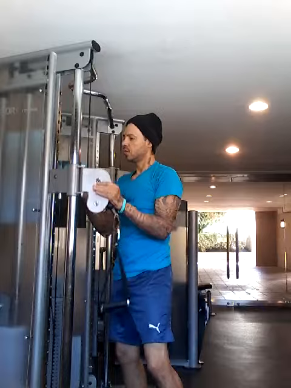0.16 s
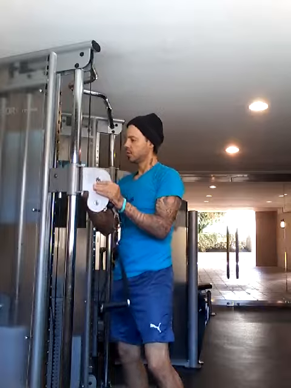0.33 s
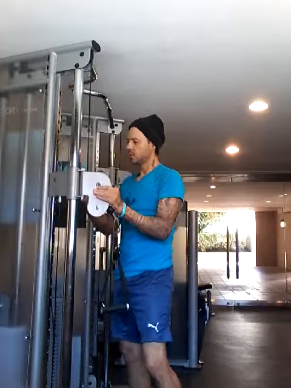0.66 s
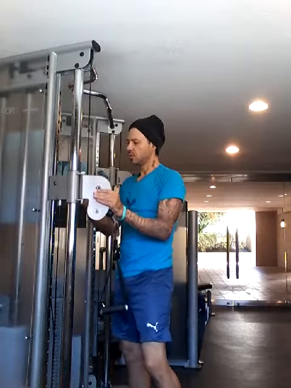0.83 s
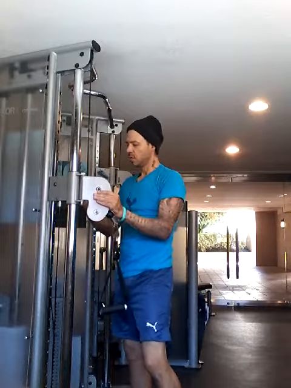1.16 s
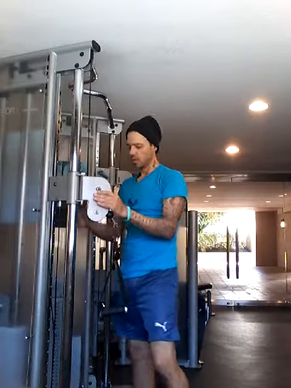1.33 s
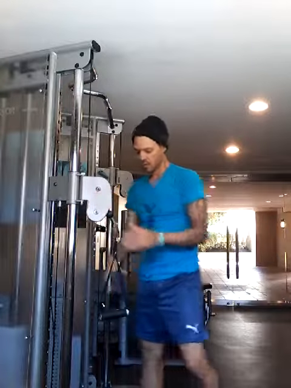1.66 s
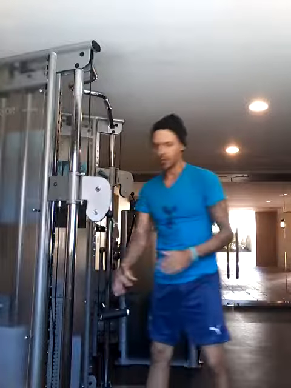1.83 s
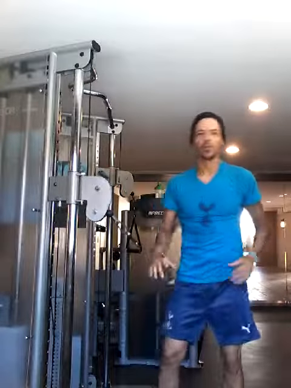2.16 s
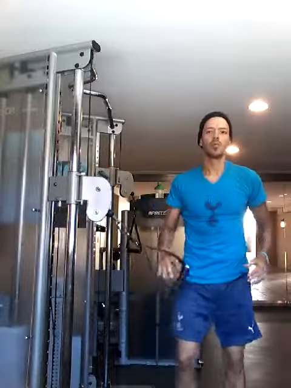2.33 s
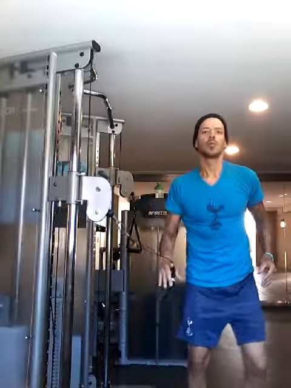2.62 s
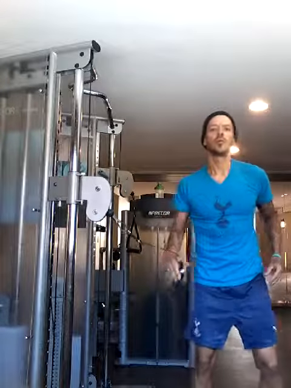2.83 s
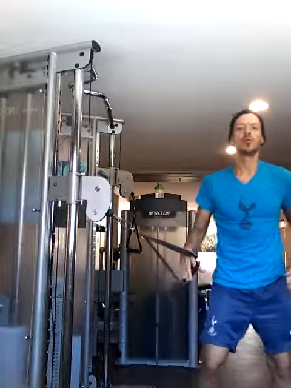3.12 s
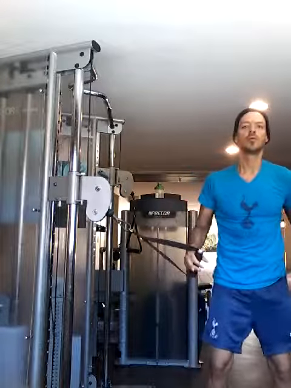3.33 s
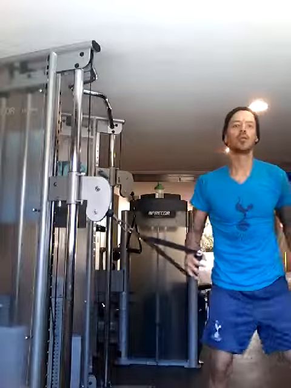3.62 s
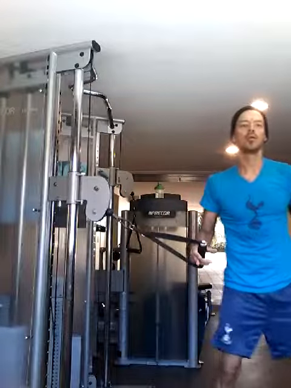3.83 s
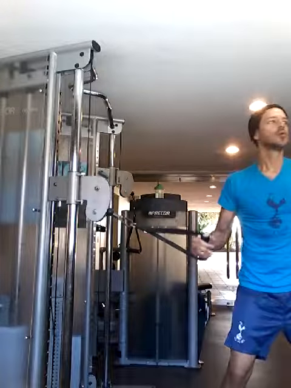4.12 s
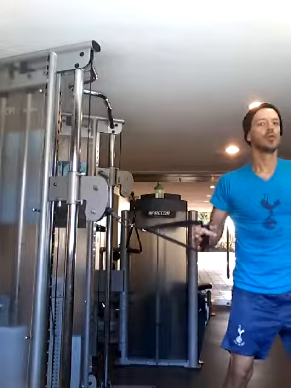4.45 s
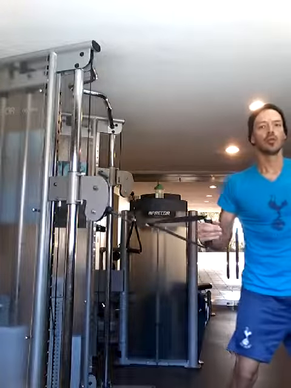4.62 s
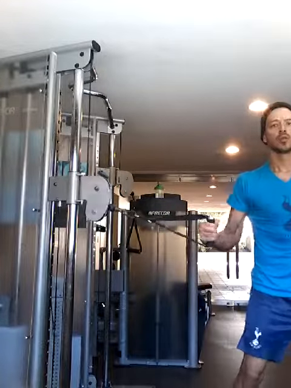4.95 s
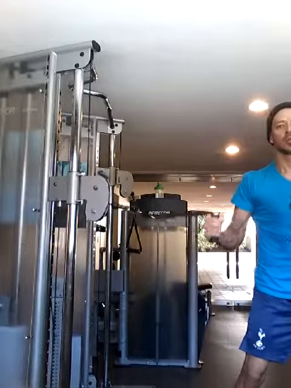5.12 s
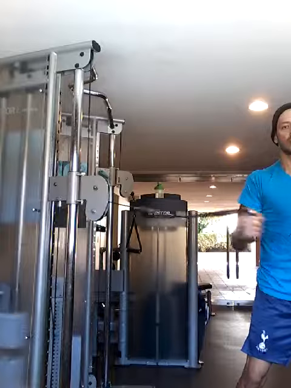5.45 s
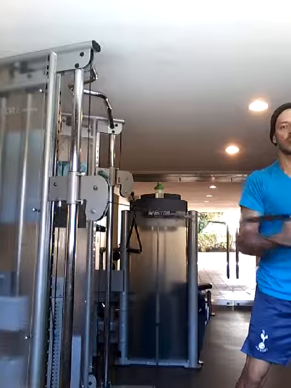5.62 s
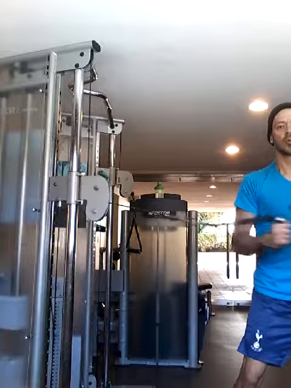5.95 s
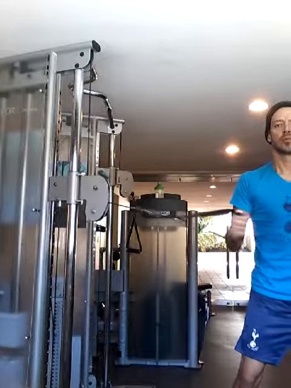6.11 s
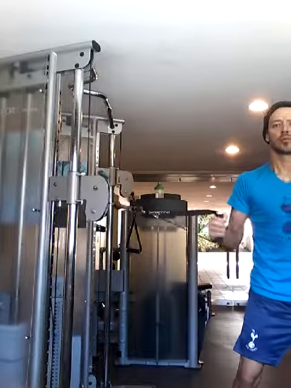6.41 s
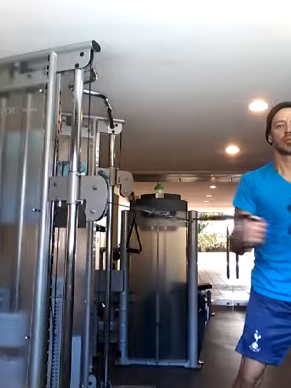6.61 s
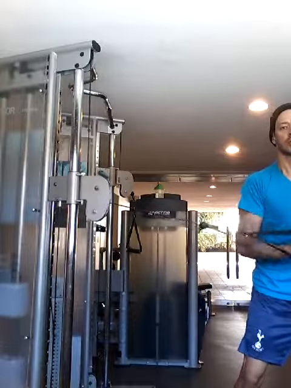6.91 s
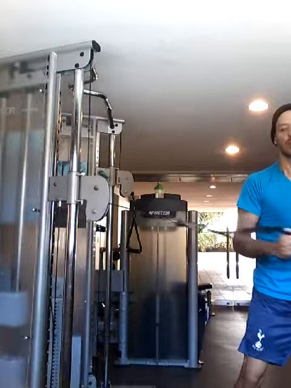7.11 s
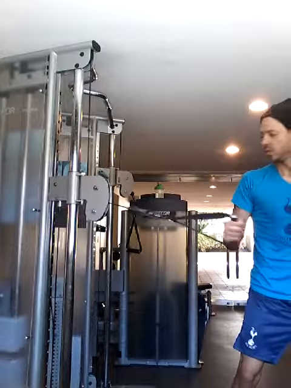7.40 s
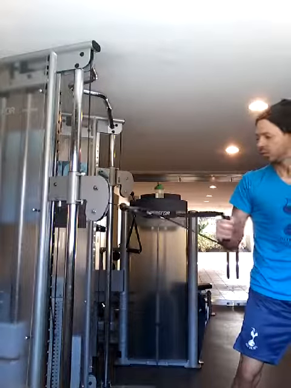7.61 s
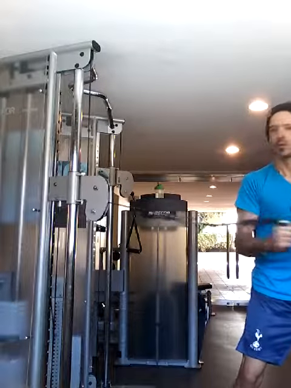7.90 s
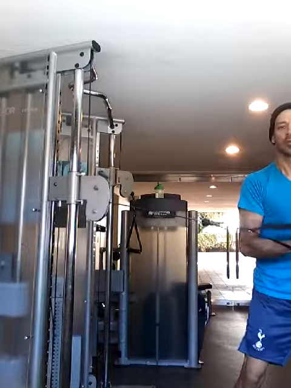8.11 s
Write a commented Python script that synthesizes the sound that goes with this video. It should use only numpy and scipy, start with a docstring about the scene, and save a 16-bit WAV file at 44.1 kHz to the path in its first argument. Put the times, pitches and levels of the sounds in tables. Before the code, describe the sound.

Close up in a hard-walled gym, a cable machine's carriage knocks and locks with a loud ringing metal crash; later the weight stack clanks twice.

```python
"""A cable machine in a hard-walled gym, heard close up by a phone microphone beside it, the same in both channels.
The pulley carriage knocks along its post and locks with a crash; the snap hook jingles, the cable rubs over
the pulley, the swivel clinks, the handle knocks, and the selector rod picks up a weight stack that drops back.
Each steel part is a gritty contact burst, beating modes and a decaying noise wash. Soft footfalls are short
dull noise, the rub and the ventilation coloured noise."""
import sys
import numpy as np
from scipy import signal
from scipy.fft import rfft, irfft, next_fast_len
from scipy.io import wavfile
from scipy.ndimage import uniform_filter1d

SR = 44100
rng = np.random.default_rng(int(sys.argv[2]) if len(sys.argv) > 2 else 0)


def transcribe(signal):
    """Save signal, clipped to [-1, 1], as a 16-bit WAV file at the path in sys.argv[1]."""
    frames = np.atleast_2d(signal).T
    limited = np.clip(frames, -1, 1)
    pcm = np.round(limited * 32767).astype(np.int16)
    wavfile.write(sys.argv[1], SR, pcm)


N = 364703
STRIKE_TIME_S = np.arange(2 * SR) / SR  # time axis of one strike
SCENE_TIME_S = np.arange(N) / SR

# Blows on each steel part: start_s, level_db, brightness_db_per_octave, modes_db, chatter_s
SLIDE_BLOWS = [(.094, -31, 0, -2, 0.011)]
PIN_BLOWS = [(.780, -40, 0, -3, .003), (.938, -20, 0, -14.5, 0.012)]
FRAME_BLOWS = [(.950, -13.5, -1, -2.5, 0.15), (1.017, -23, 3.5, -13, 0.04), (1.165, -21.5, -0.5, -4.5, 0.1),
               (1.321, -30, -2, -2, 0.018)]
ROD_BLOWS = [(5.149, -31.5, 1.8, -3, 0.043), (5.166, -29, -2.5, -2.5, 0.1)]
STACK_BLOWS = [(6.364, -18, 0.6, -7, 0.074), (6.405, -23, -0.65, -1, 0.084)]
# Swivel clinks: the same columns, then place_struck (0 rim to 1 axle)
SWIVEL_BLOWS = [(3.143, -54, -1, -3, .002, .2), (3.165, -44, -3, 1, .002, .5), (3.180, -35, .8, 7, .02, 0),
                (4.869, -46.5, -2.5, 10, .004, 1)]
# Snap hook jingles, as the handle swings: start_s, level_db
HOOK_JINGLES = [(.002, -55), (.37, -56), (1.515, -51), (1.905, -56), (2.325, -52.5), (2.718, -54.5),
                (2.93, -59.5)]
# Dry knocks of strap and handle: start_s, level_db
HANDLE_KNOCKS = [(3.896, -51), (4.25, -51.5), (4.615, -59)]
# Firm footfalls, timed at the sole: start_s, level_db
FOOTFALLS = [(.653, -44.5), (3.944, -47.5), (4.615, -50.5), (5.87, -41.5)]
# Light shuffling: start_s, end_s, level_db, brightness_db_per_octave
SHUFFLES = [(4.0, 4.8, -54, 0.5), (6.0, 6.25, -52, 3), (7.2, 8.25, -55.5, -4.5)]

# Ringing modes of each part: pitch_hz, relative_level_db, t60_s
SLIDE_MODES = [(578, -10, .9), (1310, -0.5, 0.71), (1440, -0.5, 0.64), (1495, -3, 2), (1850, -1, .7),
               (2049, -2.5, .8), (2190, -5, 1.1), (2420, -5, 1.5), (3693, -9, .7), (3849, -11.5, 1.0),
               (4300, -14, 1.9), (4550, -10, .7)]
PIN_MODES = [(1790, 2, 0.86), (3350, 0, 1), (3510, -2.5, .8), (4330, -6.5, .7), (5946, -5.5, .6),
             (6600, -8.5, .6), (13300, -4, .4)]
FRAME_MODES = [(270, -15, 1.1), (308, -11, 1.2), (339, -12, 1.2), (581, -2, 1.2), (612, -7, 1.1),
               (765, -4, 1.1), (840, -2, 1.3), (976, -2, 1.5), (1037, -3, 1.3), (1310, -3, 1.6),
               (1365, 2, 1.6), (1440, -3, 1.6), (1541, 2, 1.2), (1605, 1, 1.2), (1826, -5, 1.3),
               (2089, -4, 1.3), (2196, -3, 1.0), (2288, -8, 1.3), (2375, -2, 1.3), (2533, -6, 1.2),
               (2622, -7, 1.1), (2955, -11, 1.4), (3343, -12, 1.3), (3822, -10, 1.3), (4151, -11, 1.3),
               (4274, -9, 1.1), (4600, -9, 1.3), (5722, -13, 1.4), (5950, -15, 1.3)]
ROD_MODES = [(307, -7, 1.0), (576, -1, 1.0), (609, -3, 1.0), (738, -4, .9), (1034, -2, 1.3),
             (1254, -4, 1.1), (1452, -6, 1.0), (1545, -4, 1.0), (1696, -8, 1.2), (2880, -14, 1.3),
             (3335, -1, 1.0), (3495, 0, .9), (4118, -13, .8), (5093, -18, .9), (6550, -18, .8),
             (12400, -16, .65)]
STACK_MODES = [(619, -9, 1.1), (980, -8, 1.3), (1365, -5, 1.3), (1459, -6, 1.3), (1637, -6, 1.4),
               (2304, -10, .8), (2605, -4, 1.2), (2713, 4, 1.05), (3192, -9, 1.0), (3320, -6, 1.3),
               (3490, -3, 1.15), (4102, -10, 1.2), (4479, -11, 1.3), (5087, -11, .8)]
HOOK_MODES = [(3190, -4, 0.91), (3780, 1.5, 1.4), (3760, -13, 1), (4510, -1, 1.3), (4460, -3, 4),
              (5300, -14.5, 0.72), (7300, -10.5, .6), (7500, -8.5, .6), (9437, -10.5, .7)]
PING_MODES = [(13750, 0, 0.23), (14100, -3, .08)]
# Swivel modes: pitch_hz, rim_level_db, axle_level_db, t60_s
SWIVEL_MODES = [(662, -19, -15, 1.5), (738, -11, -17, .9), (964, -11, -11, 1.2), (1265, -12, -7, 1.5),
                (1410, -5, -22, 1.4), (1572, -13, -8, 1.1), (1750, -4, -3, 1.5), (1826, -3, -20, 1.3),
                (1985, -11, -1, 1.0), (2060, -4, -14, 1.0), (2342, -3, -22, 1.0), (2385, -3, -25, 1.1),
                (2795, -1, -6, 1.1), (2907, -4, -17, .8), (3467, -11, -22, 1.0), (3639, -10, -21, 1.1),
                (3790, -14, -30, 1.1), (4673, -18, -33, 1.0), (4883, -19, -33, 1.3), (5115, -16, -25, .9),
                (6083, -24, -38, 1.0)]

# Colour of each wash of packed modes and echoes: frequency_hz, relative_level_db_per_hz
SLIDE_WASH = [(100, -13), (200, -19.5), (750, -13), (1400, -1.5), (2000, -4.5), (2550, -2), (3100, -16),
              (3600, -8), (4400, -8.5), (5300, -23.5), (7800, -35), (12000, -31), (16000, -36)]
PIN_WASH = [(100, -22), (500, -8.5), (1700, 1.5), (2600, -11.5), (3500, 0), (5000, -8), (6800, -9),
            (8800, -15), (13500, -6), (16000, -14.5)]
FRAME_WASH = [(60, -38.5), (170, -24.5), (300, -14), (480, -10.5), (620, -6.5), (1000, 1), (1130, -4),
              (1450, -0.5), (2400, -4), (3100, -7), (4300, -8), (7800, -29), (12000, -28), (16000, -41.5)]
ROD_WASH = [(29, -55), (50, -25), (75, -18), (246, -21.5), (306, -11), (483, -10.5), (586, -5.5),
            (678, -10), (1050, -5), (3180, -14.5), (3410, -10.5), (5810, -26), (6550, -28), (12300, -25.5),
            (16000, -24.5)]
STACK_WASH = [(21, -50), (35, -22), (79, -8.5), (143, -21), (190, -12), (955, -4.5), (1090, -10.5),
              (1330, -2), (2060, -8.5), (2660, -7), (3020, -10), (3440, -6.5), (7610, -20.5), (13000, -19),
              (16000, -27.5)]
HOOK_WASH = [(300, -16.5), (1100, -9), (2600, -6), (4400, 5), (5400, -12.5), (16000, -26.5)]
SWIVEL_WASH = [(100, -16), (450, -14), (750, -8), (2100, 0), (3500, -9), (5000, -18), (8000, -29),
               (13000, -23), (16000, -25)]
STEP_WASH = [(40, -8), (80, 4), (300, 0), (750, -1), (1500, -12), (3000, -19), (8000, -38.5), (16000, -34)]
# Room and steel decay of a wash, before each part's length factor: frequency_hz, t60_s
WASH_T60 = [(80, 1.9), (260, 1.31), (700, 1.32), (1400, 1.58), (2500, 1.21), (4500, 1.43), (7500, 0.97),
            (14000, .6)]
# Colour of the steady noises: frequency_hz, relative_level_db_per_hz
RUMBLE_COLOUR = [(25, -23.5), (50, -1), (78, 4.5), (100, -1), (130, 1.5), (300, -7), (600, -5.5),
                 (1100, -6), (2000, -14), (4000, -24), (6000, -32), (16000, -43)]
HISS_COLOUR = [(2000, -13.5), (4500, -1.5), (7000, -2), (12500, 5), (16000, 1)]
RUB_COLOUR = [(60, -2), (150, -5.5), (400, -5), (800, -2.5), (1100, 2.5), (1500, -3), (2500, -13),
              (4500, -17), (6500, -32.5), (16000, -34)]

# Ventilation: the rumble sinks from its starting level, the hiss does not
RUMBLE_START_DB, RUMBLE_SINK_DB_PER_S, HISS_DB = -49, 0.91, -68
# Shared by all jingles
HOOK_BRIGHT_DB_PER_OCTAVE, HOOK_MODES_DB, HOOK_CHATTER_S = .3, -2.5, .03
# The frame's ring drops as the carriage settles
SEATED_S, SEATING_S, SEATED_DB = 1.397, .06, -4.5
# The heel touches just before the sole
STEP_BRIGHT_DB_PER_OCTAVE, HEEL_LEAD_S, HEEL_DB = 1, .042, -5.5
SCUFFS_PER_S, SCUFF_SCATTER_DB, SCUFF_SCATTER_S = 6.5, 2.5, 0.018
RUB_FROM_S, RUB_TO_S, RUB_EASE_S, RUB_DB = 1.62, 3.83, 0.22, -53.5
PING_S, PING_DB = 4.43, -55
MIC_TOP_HZ = 15900


def undb(db):
    """Turn decibels into gain."""
    return 10 ** (np.asarray(db) / 20)


def unit(x):
    """Scale to rms 1."""
    return x / np.sqrt(np.mean(x ** 2))


def read(points, hz):
    """Join (frequency, value) points by straight lines on a log-frequency axis."""
    frequency_hz, value = np.transpose(points)
    return np.interp(np.log(np.maximum(hz, 1)), np.log(frequency_hz), value)


def fade(age, t60):
    """Decay exponentially, 60 dB down after t60."""
    return np.exp(-np.log(1000) * age / np.maximum(t60, 1e-3))


def tilt(hz, db_per_octave):
    """Harder contact favours the upper modes; the tilt pivots at 1500 Hz."""
    return undb(db_per_octave * np.log2(np.maximum(hz, 100) / 1500))


def walk(t, rate):
    """Draw random levels, rate of them a second, joined by lines."""
    knots = rng.standard_normal(int(t[-1] * rate) + 2)
    return np.interp(t * rate, np.arange(len(knots)), knots)


def add(track, s, sound):
    """Mix a sound in at time s."""
    start = max(int(s * SR), 0)
    track[start:start + len(sound)] += sound[:N - start]


def coloured(spectrum):
    """Steady noise of rms 1 with the given colour."""
    size = next_fast_len(N, real=True)
    hz = np.fft.rfftfreq(size, 1 / SR)
    noise = rfft(rng.standard_normal(size))
    return unit(irfft(noise * undb(read(spectrum, hz)), size)[:N])


def wash(spectrum, bright, age, length, size=1024):
    """Countless overlapping modes and echoes, as noise whose highest treble dies soonest."""
    noise = rng.standard_normal(len(STRIKE_TIME_S))
    hz, t, cells = signal.stft(noise, SR, nperseg=size)
    colour = unit(undb(read(spectrum, hz)) * tilt(hz, bright))
    t60 = length * read(WASH_T60, hz)[:, None]
    decay = fade(np.interp(t, STRIKE_TIME_S, age), t60)
    sound = signal.istft(cells * colour[:, None] * decay, SR, nperseg=size)[1]
    return sound[:len(STRIKE_TIME_S)]


def ring(modes, bright, age, width_hz, waver):
    """Clear modes; close neighbours and wall reflections make each one beat in level and phase."""
    pitch_hz, level_db, t60_s = np.transpose(modes)
    sizes = undb(level_db) * tilt(pitch_hz, bright)
    out = np.zeros(len(STRIKE_TIME_S))
    for hz, gain, t60 in zip(pitch_hz, sizes / np.linalg.norm(sizes), t60_s):
        cycles = (hz * STRIKE_TIME_S + rng.random()) % 1
        phase = (2 * np.pi * cycles).astype(np.float32)
        in_phase = (1 + waver * walk(STRIKE_TIME_S, width_hz)) * np.sin(phase)
        quadrature = waver * walk(STRIKE_TIME_S, width_hz) * np.cos(phase)
        out += gain * unit(in_phase + quadrature) * fade(age, t60)
    return out


def crack(spectrum, bright, t60, grain_db=4, grain_hz=700, size=8192):
    """The contact itself: a short burst of noise made gritty by fast random level changes."""
    hz = np.arange(size // 2 + 1) * SR / size
    t = STRIKE_TIME_S[:size]
    noise = rfft(rng.standard_normal(size))
    burst = irfft(noise * undb(read(spectrum, hz)) * tilt(hz, bright))
    gritty = unit(burst * undb(grain_db * walk(t, grain_hz)))
    return gritty * fade(t, t60)


def strike(blows, modes, spectrum, length, width_hz, waver, direct,
           crack_db, crack_bright, crack_t60, rise_s, direct_t60=0.095):
    """Blows on one steel part: contact crack, clear modes and their wash."""
    out = np.zeros(N)
    # direct lifts the modes at the start of a blow
    first_burst = 1 + direct * fade(STRIKE_TIME_S, direct_t60)
    rise = np.minimum(STRIKE_TIME_S / max(rise_s, 1e-4), 1)
    for start_s, level_db, bright, modes_db, chatter_s in blows:
        # while loose parts chatter they feed the ring, so its decay starts late
        age = np.hypot(STRIKE_TIME_S, chatter_s) - abs(chatter_s)
        sound = wash(spectrum, bright, age, length)
        sound += undb(modes_db) * first_burst * ring(modes, bright, age, width_hz, waver)
        add(sound, 0, undb(crack_db) * crack(spectrum, bright + crack_bright, crack_t60))
        add(out, start_s, undb(level_db) * sound * rise)
    return out


def ventilation():
    """Ventilation rumble and a thin hiss, wavering together in level."""
    rumble_db = RUMBLE_START_DB - RUMBLE_SINK_DB_PER_S * SCENE_TIME_S
    out = coloured(RUMBLE_COLOUR) * undb(rumble_db) + coloured(HISS_COLOUR) * undb(HISS_DB)
    return out * undb(.7 * walk(SCENE_TIME_S, 18))


def snap_hook():
    """The snap hook jingles: soft-edged blows on small, high steel modes."""
    jingles = [(start_s, level_db, HOOK_BRIGHT_DB_PER_OCTAVE, HOOK_MODES_DB, HOOK_CHATTER_S)
               for start_s, level_db in HOOK_JINGLES]
    return strike(jingles, HOOK_MODES, HOOK_WASH, length=.7, width_hz=55, waver=1.3, direct=0,
                  crack_db=-6, crack_bright=1, crack_t60=.06, rise_s=.012)


def carriage_slide():
    """The sliding carriage knocks on its post and excites its modes."""
    return strike(SLIDE_BLOWS, SLIDE_MODES, SLIDE_WASH, length=1.0, width_hz=30, waver=1.4, direct=0.18,
                  crack_db=2.5, crack_bright=5.0, crack_t60=0.083, rise_s=0.0021)


def spring_pin():
    """The spring pin clicks and snaps home: sharp blows on high, quickly beating modes."""
    return strike(PIN_BLOWS, PIN_MODES, PIN_WASH, length=1.0, width_hz=64, waver=1.9, direct=0,
                  crack_db=4.0, crack_bright=2, crack_t60=.1, rise_s=.001)


def frame_crash():
    """The locking carriage shakes the whole frame, whose ring drops as the carriage settles."""
    frame = strike(FRAME_BLOWS, FRAME_MODES, FRAME_WASH, length=0.83, width_hz=38, waver=1.4, direct=0,
                   crack_db=0, crack_bright=4, crack_t60=.15, rise_s=0.0013)
    seated = np.clip((SCENE_TIME_S - SEATED_S) / SEATING_S, 0, 1)
    return frame * undb(SEATED_DB * seated)


def footsteps(length=.38, rise_s=.006):
    """Dull heel-and-sole footfalls and random scuffs on rubber flooring, as short noise washes."""
    touches = []
    for start_s, level_db in FOOTFALLS:
        touches.append((start_s - HEEL_LEAD_S, level_db + HEEL_DB, STEP_BRIGHT_DB_PER_OCTAVE))
        touches.append((start_s, level_db, STEP_BRIGHT_DB_PER_OCTAVE))
    for start_s, end_s, level_db, bright in SHUFFLES:
        for scuff_s in np.arange(start_s, end_s, 1 / SCUFFS_PER_S):
            late, strong = rng.standard_normal(2)
            scuff_db = level_db + SCUFF_SCATTER_DB * strong
            touches.append((scuff_s + SCUFF_SCATTER_S * late, scuff_db, bright))
    out = np.zeros(N)
    rise = np.minimum(STRIKE_TIME_S / rise_s, 1)
    for touch_s, level_db, bright in touches:
        touch = wash(STEP_WASH, bright, STRIKE_TIME_S, length) * rise
        add(out, min(touch_s, N / SR), undb(level_db) * touch)
    return out


def cable_rub(rough_db=3.0):
    """The cable rubs softly and unevenly while it is drawn out over the pulley."""
    since_start, until_end = SCENE_TIME_S - RUB_FROM_S, RUB_TO_S - SCENE_TIME_S
    speed = np.clip(np.minimum(since_start, until_end) / RUB_EASE_S, 0, 1)
    return speed * coloured(RUB_COLOUR) * undb(RUB_DB + rough_db * walk(SCENE_TIME_S, 14))


def pulley_swivel():
    """The tightening swivel clinks with modes that depend on where it is struck, rim to axle."""
    out = np.zeros(N)
    for *blow, place in SWIVEL_BLOWS:
        toward_axle = np.clip(place, 0, 1)
        modes = [(hz, rim_db + toward_axle * (axle_db - rim_db), t60)
                 for hz, rim_db, axle_db, t60 in SWIVEL_MODES]
        out += strike([blow], modes, SWIVEL_WASH, length=1.0, width_hz=52, waver=1.3, direct=2.0,
                      crack_db=11.0, crack_bright=0.15, crack_t60=0.063, rise_s=0.002)
    return out


def handle_knocks(bright=-1, t60=.14):
    """Short dry knocks of the handle on its hook: contact bursts without ringing modes."""
    out = np.zeros(N)
    for start_s, level_db in HANDLE_KNOCKS:
        add(out, start_s, undb(level_db) * crack(SWIVEL_WASH, bright, t60))
    return out


def fittings_ping():
    """One faint, very high ping from the fittings: two short beating modes."""
    out = np.zeros(N)
    ping = ring(PING_MODES, 0, STRIKE_TIME_S, width_hz=150, waver=1)
    add(out, PING_S, undb(PING_DB) * ping)
    return out


def selector_rod():
    """The rod takes up the plates in two close blows on its modes."""
    return strike(ROD_BLOWS, ROD_MODES, ROD_WASH, length=0.79, width_hz=36, waver=0.89, direct=0,
                  crack_db=3.0, crack_bright=2.5, crack_t60=0.11, rise_s=0.0042)


def weight_stack():
    """The plates land and close on each other within milliseconds, so each blow rises briefly."""
    return strike(STACK_BLOWS, STACK_MODES, STACK_WASH, length=0.89, width_hz=34, waver=1.3, direct=0,
                  crack_db=4.5, crack_bright=6.1, crack_t60=0.12, rise_s=0.0056)


def scene():
    """Everything reaches the phone as one centred sound."""
    machine = snap_hook() + carriage_slide() + spring_pin() + frame_crash() + cable_rub()
    machine += pulley_swivel() + handle_knocks() + fittings_ping() + selector_rod() + weight_stack()
    mid = ventilation() + machine + footsteps()
    return np.array([mid, mid])


def expander(x, open_db=-45, slope=0.69, depth_db=8, size=1400):
    """The phone turns quiet passages down, which hurries the end of the tails."""
    power = uniform_filter1d(x[0] ** 2, size)
    level_db = 10 * np.log10(np.maximum(power, 1e-12))
    return x * undb(np.clip(slope * (level_db - open_db), -depth_db, 0))


def record(dry, low_cut_hz=42):
    """The phone drops the deepest bass, lowers the quiet, rounds the loudest peaks and cuts the top."""
    low_cut = signal.butter(3, low_cut_hz, "highpass", fs=SR, output="sos")
    top_cut = signal.ellip(10, .2, 80, MIC_TOP_HZ, fs=SR, output="sos")
    heard = signal.sosfilt(low_cut, dry)
    rounded = np.tanh(expander(heard))
    return signal.sosfilt(top_cut, rounded)


dry = scene()
out = record(dry)
transcribe(out)
```